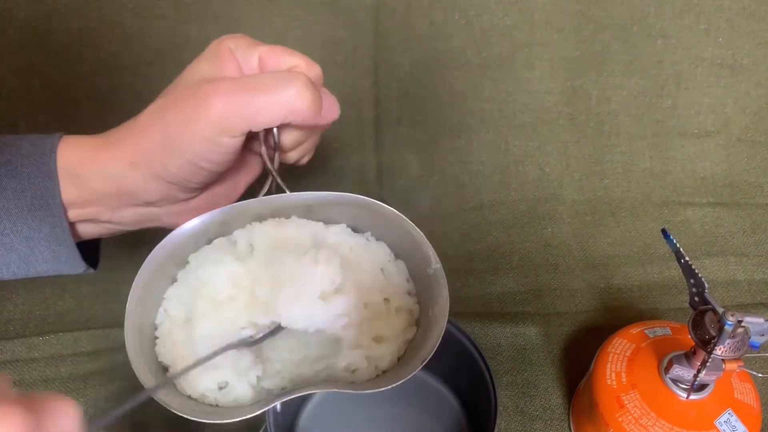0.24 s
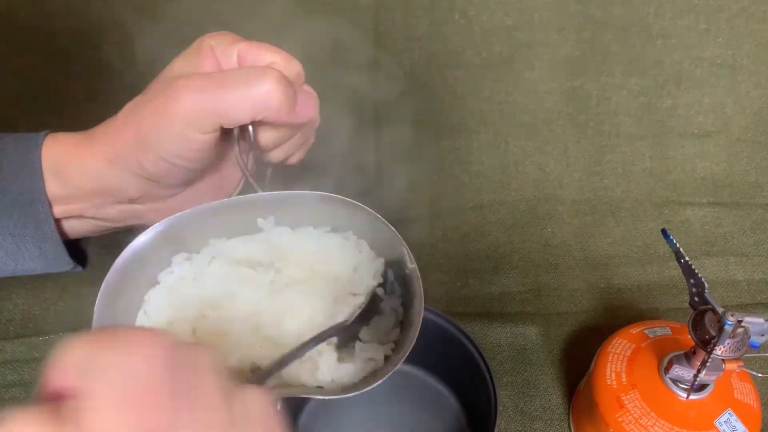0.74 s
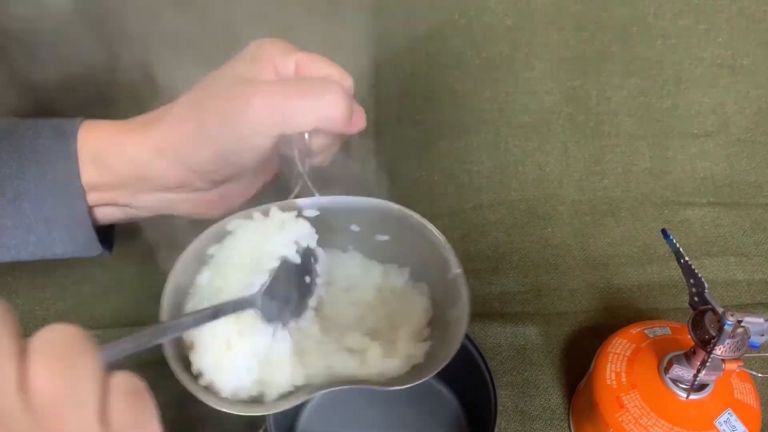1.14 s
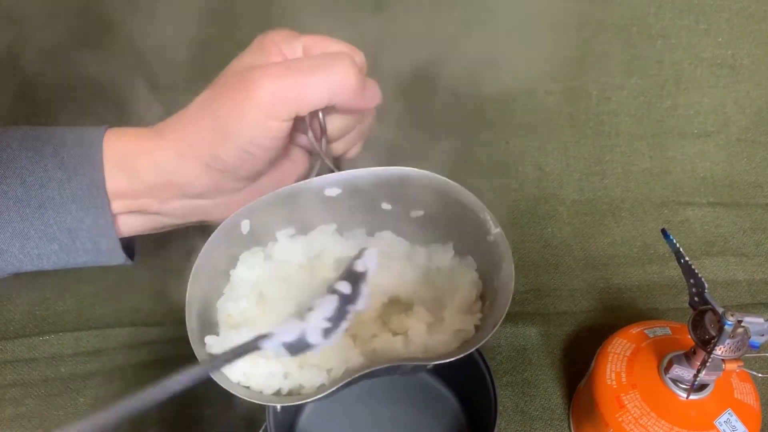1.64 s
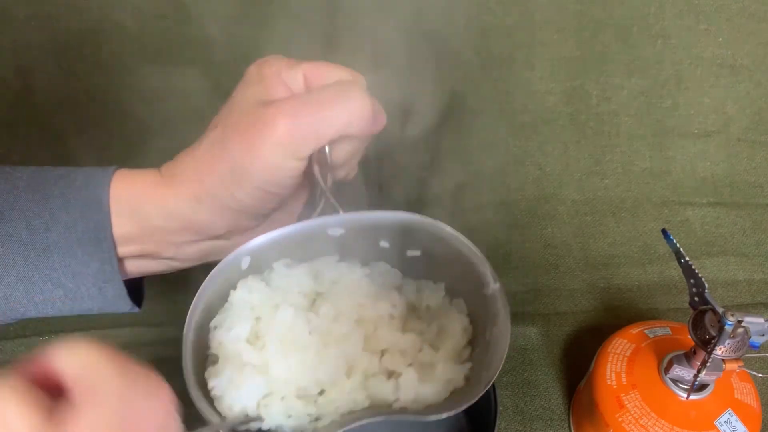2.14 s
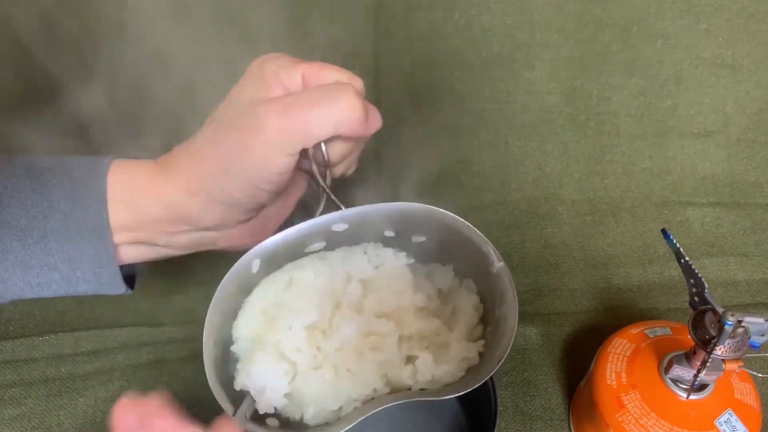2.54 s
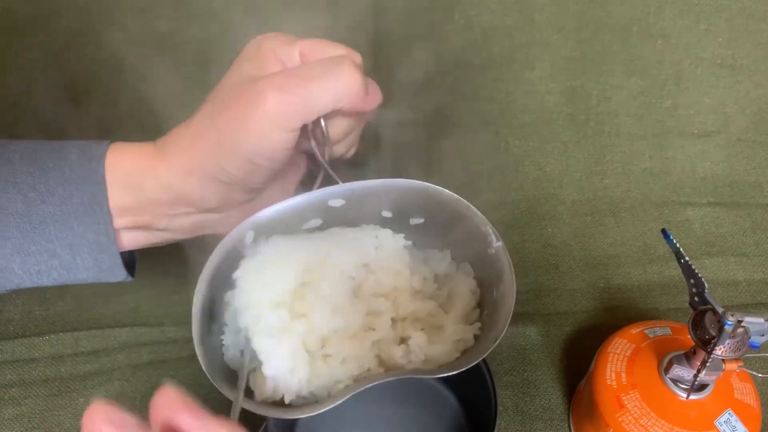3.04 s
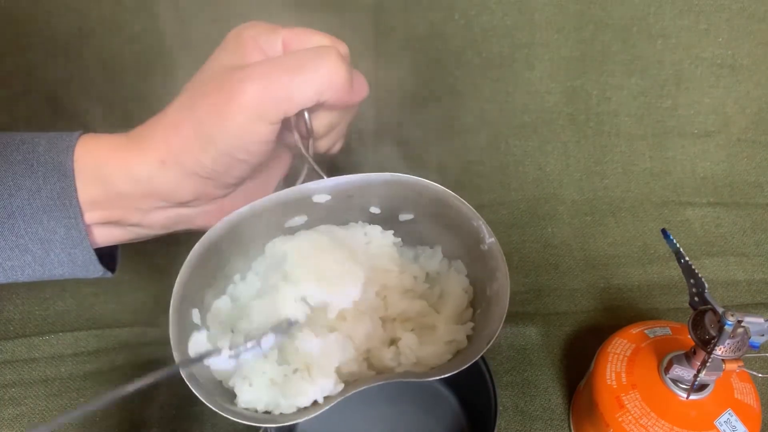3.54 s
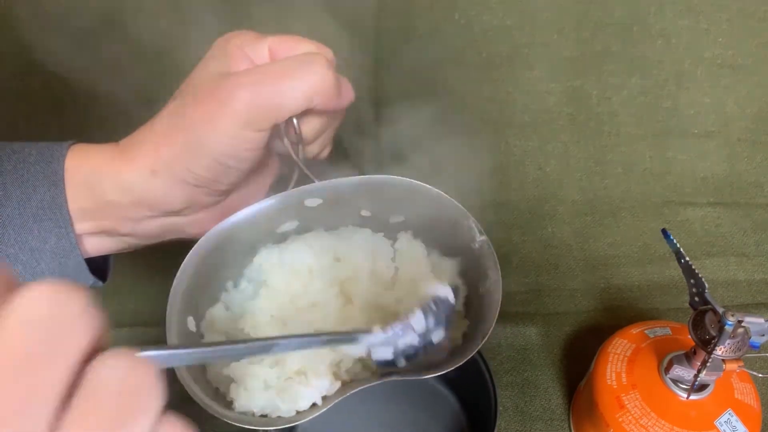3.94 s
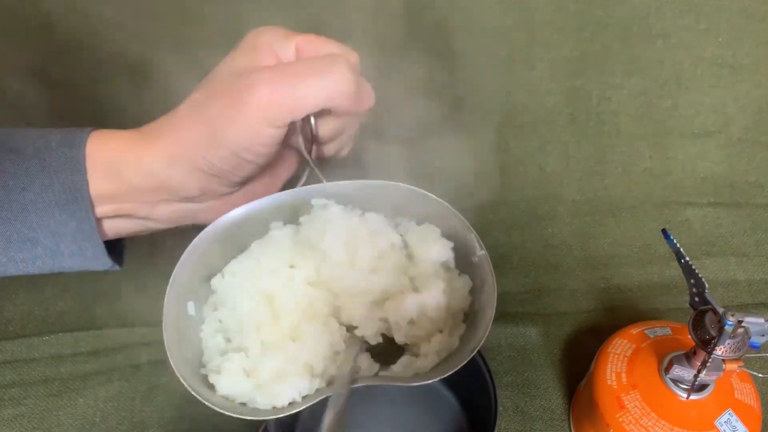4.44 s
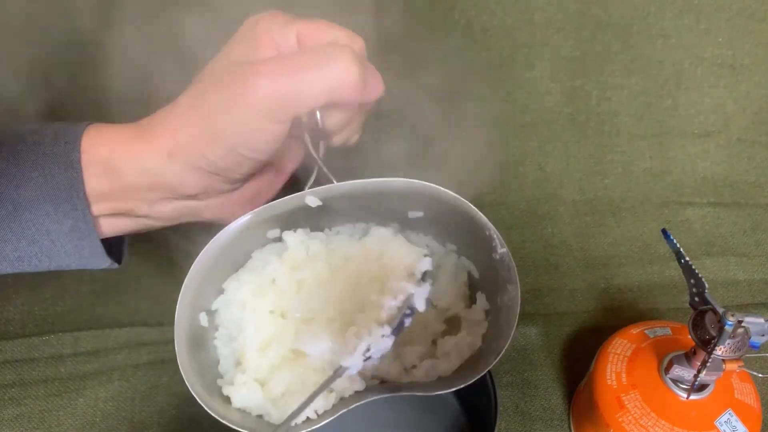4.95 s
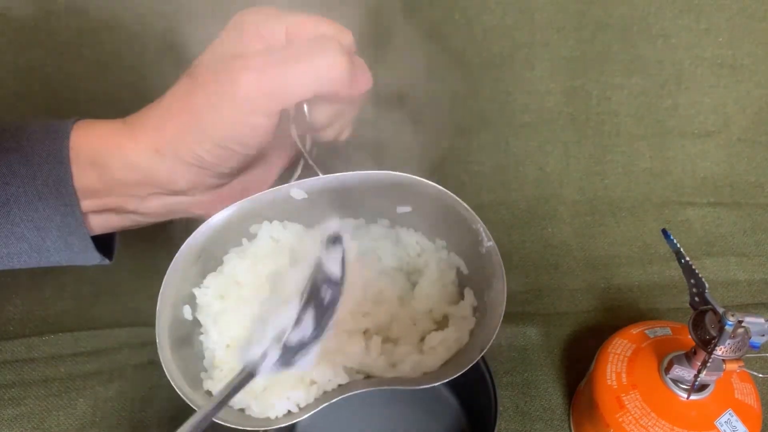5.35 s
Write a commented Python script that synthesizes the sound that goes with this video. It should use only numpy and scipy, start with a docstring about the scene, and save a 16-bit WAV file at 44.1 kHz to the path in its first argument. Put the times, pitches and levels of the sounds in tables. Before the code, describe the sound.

Close clinks, hollow thuds and a short scrape of a spoon stirring rice in a metal cup, with small paired clicks.

```python
"""Spoon in a camping cup of rice

Close to one microphone, a steel spoon works cooked rice in a metal cup hung from its wire handle.
It knocks and clinks, thuds through the rice, scrapes twice and clacks on the cup's wall, ringing
the metal's modes. Sticky grains rustle, and small springy clicks come in pairs, like a mouse button.
Hard surfaces nearby give a short reverberation, over still air and a faint hum."""
import sys
import numpy as np
from scipy import signal
from scipy.fft import rfft, irfft, next_fast_len
from scipy.io import wavfile

SR = 44100
rng = np.random.default_rng(int(sys.argv[2]) if len(sys.argv) > 2 else 0)


def bounce(signal):
    """Save signal as a 16-bit WAV file at the path given by the first command-line argument."""
    frames = np.transpose(np.atleast_2d(signal))
    limited = np.clip(frames, -1, 1)
    pcm = np.round(limited * 32767).astype(np.int16)
    wavfile.write(sys.argv[1], SR, pcm)


N = 246953


def from_db(db):
    """Decibels to gain."""
    return 10 ** (np.asarray(db) / 20)


def rms_one(x):
    """Scale to rms 1."""
    return x / np.sqrt(np.mean(x ** 2) + 1e-20)


def energy_one(x):
    """Scale to energy 1."""
    return x / np.sqrt(np.sum(x ** 2) + 1e-20)


def at_hz(points, hz):
    """Read a table on a log-frequency axis."""
    frequencies, values = np.transpose(points)
    return np.interp(np.log(np.maximum(hz, 1)), np.log(frequencies), values)


def through(x, response):
    """Pass a sound through an impulse response."""
    size = next_fast_len(N + len(response), True)
    return irfft(rfft(x, size) * rfft(response, size), size)[:N]


def colour(spectrum, size=8192):
    """Causal (minimum-phase) response of energy 1 with the given spectral shape."""
    hz = np.arange(size // 2 + 1) * SR / size
    cepstrum = irfft(np.log(from_db(at_hz(spectrum, hz))))
    cepstrum[1:size // 2] *= 2
    cepstrum[size // 2 + 1:] = 0
    return energy_one(irfft(np.exp(rfft(cepstrum)))[:size // 2])


def body(modes):
    """Response of energy 1 of damped modes that start together; wider ones die sooner."""
    t = np.arange(SR // 2) / SR
    ring = sum(from_db(db) * width * np.exp(-np.pi * width * t) * np.sin(2 * np.pi * hz * t)
               for hz, width, db in modes)
    return energy_one(ring)


def drift(per_s):
    """Slow wander between random values."""
    knots = rng.standard_normal(2048)
    return np.interp(np.arange(N) / SR * per_s, np.arange(len(knots)), knots)


def clicks(rows, column=1):
    """One impulse per row, with the level in the given column."""
    out = np.zeros(N)
    for row in rows:
        out[round(row[0] * SR)] += from_db(row[column])
    return out


def grains(per_s, spread_db):
    """Random slips of uneven size, rms 1."""
    slipping = rng.random(N) < per_s / SR
    signs = rng.choice([-1, 1], N)
    sizes = from_db(spread_db * np.minimum(rng.exponential(1, N), 4))
    return rms_one(slipping * signs * sizes)


def swell(start, length, db):
    """Gain of one smooth push."""
    progress = np.clip((np.arange(N) / SR - start) / length, 0, 1)
    return from_db(db) * np.sqrt(np.abs(np.sin(np.pi * progress)))


def stroke(start, length, db, attack_s, sag_db_per_s, release_db_per_s):
    """Gain of one push: a quick rise, a steady sag while it lasts, then a faster release."""
    t = np.arange(N) / SR - start
    fall_db = sag_db_per_s * np.clip(t, 0, length) + release_db_per_s * np.maximum(t - length, 0)
    return np.clip(t / attack_s, 0, 1) * from_db(db - fall_db)


# Decay among the hard surfaces around the microphone: (frequency [Hz], time to fall 60 dB [s])
ROOM_DECAY = [(100, 0.32), (300, 0.11), (700, 0.5), (1400, 0.2826), (4000, 0.42), (8000, 0.2555),
              (15000, 0.39)]
def reverb(x, build_s=0.0087, bands=14):
    """A diffuse tail builds up, then each band dies at its own rate."""
    t = np.arange(SR * 3 // 4) / SR
    white = rfft(rng.standard_normal(len(t)))
    hz = np.arange(len(white)) * SR / len(t)
    centres = np.geomspace(80, 16000, bands)
    tail = 0
    for centre, share in zip(centres, np.eye(bands)):
        band = irfft(white * at_hz(np.c_[centres, share], hz), len(t))
        tail = tail + band * np.exp(-np.log(1000) * t / at_hz(ROOM_DECAY, centre))
    build_up = 1 - np.exp(-(t / build_s) ** 2)
    return through(x, energy_one(tail * build_up))


def room(x, wet_db, build_s=0.015):
    """The direct sound at the microphone plus its reverberation."""
    return x + from_db(wet_db) * reverb(x, build_s)


# Still air all around: (frequency [Hz], relative level [dB])
AIR_SPECTRUM = [(12, -45), (20, -9), (49, -6.5), (86, -12.5), (123, 0.5), (146, -22.5), (177, -13),
                (234, -16.5), (328, -17), (357, -15.5), (574, -20), (3160, -32), (4670, -35.5), (7950, -37),
                (16000, -63.5)]
# Faint hum of the place: (frequency [Hz], rms level [dB], unsteadiness [0-1])
HUM_TONES = [(44.6, -66, 0.37), (59.2, -63, 0.59), (117.3, -62.5, 0.13), (125, -67.5, 0.14),
             (173, -70.5, 0.62), (325.2, -68.5, 0.09), (569, -73.5, 0.46), (685, -78.5, 0.081),
             (1316, -82, 0.13), (6900, -88.5, 0.13)]
def room_tone():
    """Still air, a trace of hiss and a wavering hum lie behind the cup."""
    t = np.arange(N) / SR
    air = from_db(-59.5) * rms_one(through(rng.standard_normal(N), colour(AIR_SPECTRUM)))
    hiss = from_db(-80) * rng.standard_normal(N)
    hum = 0
    for hz, db, unsteady in HUM_TONES:
        sway = 1 - unsteady + unsteady * (drift(14) + 1j * drift(6.8))  # in level and phase
        tone = np.exp(2j * np.pi * (hz * t + rng.random()))
        hum = hum + from_db(db) * rms_one(np.real(sway * tone))
    return air + hiss + hum


# Chatter of a small springy click: (frequency [Hz], relative level [dB])
CHATTER_SPECTRUM = [(300, -26), (600, 17.5), (1200, -14), (2500, -1), (5500, 3.5), (8500, 7), (11000, -8.5),
                    (14500, -8), (16000, -7)]
def springy_click(rows, modes, chatter_db, ring_db, seat_s=0.0095, seat_db=2.5, chatter_s=0.0021):
    """A snap, then a second contact as it seats; each chatters briefly and rings."""
    contacts = clicks(rows) + from_db(seat_db) * clicks([(s + seat_s, db) for s, db in rows])
    decay = np.exp(-1 / (chatter_s * SR))
    envelope = signal.lfilter([np.sqrt(1 - decay ** 2)], [1, -decay], contacts + 1e-18)
    chatter = through(rng.standard_normal(N) * envelope, colour(CHATTER_SPECTRUM))
    return from_db(chatter_db) * chatter + from_db(ring_db) * through(contacts, body(modes))


# Clicks off-microphone: (press time [s], release time [s], press level [dB], release level [dB])
CLICK_PAIRS = [(0.6403, 0.7273, -32.5, -33), (1.2735, 1.38, -35.5, -32.5), (2.059, 2.1880, -35, -33),
               (4.3643, 4.42, -34, -33), (4.8300, 4.899, -33.5, -33)]
# Ring of the press and of the release: (frequency [Hz], width [Hz], level [dB])
PRESS_MODES = [(8040, 60, 6.5), (8330, 75, -20), (6800, 500, -15), (5400, 160, -18)]
RELEASE_MODES = [(5350, 130, -1.5), (6550, 550, -12), (12500, 550, -12), (14600, 300, -10)]
def paired_clicks():
    """Small springy clicks in pairs, like a mouse button: a ringing press, a drier release."""
    presses = [(s, db) for s, _, db, _ in CLICK_PAIRS]
    releases = [(s, db) for _, s, _, db in CLICK_PAIRS]
    down = springy_click(presses, PRESS_MODES, chatter_db=-4.5, ring_db=-6.5)
    up = springy_click(releases, RELEASE_MODES, chatter_db=-7, ring_db=-12)
    return room(down + up, wet_db=7, build_s=0.0016)


# Rice pushed about inside the cup: (time [s], length [s], level [dB])
RICE_PUSHES = [(0.0, 0.019, -60), (0.894, 0.1, -67), (1.603, 0.071, -72.5), (1.876, 0.07, -61.5),
               (2.271, 0.23, -65), (3.032, 0.1, -67), (3.126, 0.28, -76)]
# Its rustle: (frequency [Hz], relative level [dB])
RICE_SPECTRUM = [(500, 3.5), (1500, -0.5), (4000, -2.5), (7500, 1), (11000, -8.5), (13000, -6.5),
                 (16000, -8)]
def rice():
    """Sticky grains part in soft swells."""
    push = sum(swell(*row) for row in RICE_PUSHES)
    rustle = through(push * grains(per_s=6900, spread_db=2), colour(RICE_SPECTRUM))
    return from_db(3.5) * room(rustle, wet_db=-1.5)


# Brief metal tones, almost dry: (time [s], length [s], level [dB], frequency [Hz])
METAL_TONES = [(0.387, 0.21, -73.5, 7900), (0.396, 0.19, -79, 9700), (1.179, 0.012, -48, 4190),
               (1.575, 0.01, -56.5, 715), (3.823, 0.1, -53, 3260), (3.862, 0.04, -53, 4960),
               (3.91, 0.015, -59, 13000)]
def metal_tones(mode_q=42):
    """One mode sounds in each: thin squeaks, and short rings after a knock or clink."""
    drive = grains(per_s=2200, spread_db=3)
    ringing = sum(through(drive * swell(start, length, db), body([(hz, hz / mode_q, 0)]))
                  for start, length, db, hz in METAL_TONES)
    return room(ringing, wet_db=-19)


# The whole cup jolted on its handle: (time [s], level [dB])
CUP_JOLTS = [(1.0420, -7.5), (1.0490, -4), (2.3110, -10.5), (2.3225, -4.5)]
# Low modes of the hanging cup: (frequency [Hz], width [Hz], level [dB])
HANGING_MODES = [(115, 17, -17), (192, 62, -2.5), (211, 25, -4), (280, 8.4, -9.5), (335, 28, -0.5),
                 (370, 24, -21)]
def jolts():
    """The whole cup sways under two blows, and the handling rumbles around the first."""
    band = signal.butter(2, [28, 105], "band", fs=SR, output="sos")
    rumble = rms_one(signal.sosfilt(band, rng.standard_normal(N)))
    handling = stroke(1.026, length=0.19, db=-48, attack_s=0.009, sag_db_per_s=29, release_db_per_s=246)
    sway = through(clicks(CUP_JOLTS), body(HANGING_MODES))
    return room(sway, wet_db=-2.5, build_s=0.0041) + rumble * handling


# Spoon dragged along the cup's wall: (time [s], length [s], level [dB], attack [s])
SCRAPE_STROKES = [(3.6357, 0.11, -25, 0.0043), (3.826, 0.092, -49, 0.033), (3.899, 0.056, -35.5, 0.0076)]
# Its friction noise: (frequency [Hz], relative level [dB])
SCRAPE_SPECTRUM = [(100, -34), (200, -13.5), (320, -6), (520, -8), (820, -11), (1000, -7.5), (1350, -4),
                   (2400, -5.5), (3400, -3.5), (5000, -7.5), (7000, -10.5), (9800, -18), (11000, -27.5),
                   (14000, -31), (16000, -50)]
# The wall before the spoon damps it, and the cup's long ring: (frequency [Hz], width [Hz], level [dB])
SCRAPED_WALL_MODES = [(2340, 14, 2), (2590, 94, 0), (3010, 17, 3), (4300, 29, -18), (4380, 56, -9),
                      (4900, 76, -10), (5270, 86, -4), (5600, 34, -20), (6500, 42, -7), (6680, 70, -6),
                      (7160, 74, -10), (7870, 40, -4), (8200, 21, -3), (9000, 38, -13), (8650, 69, -3),
                      (12100, 69, -20)]
CUP_RING_MODES = [(1197, 1.9, -2), (1212, 5, 6), (1276, 6.4, 12), (1350, 3.9, -3), (1380, 4.7, 4),
                  (1500, 7, -15), (1852, 6.6, -6), (2040, 7.6, -5), (2314, 12, 2), (4124, 8.8, 1),
                  (5060, 5.9, -7), (5400, 8, -6)]
def scrapes(damping_hz=30):
    """Dense slips of the spoon along the wall excite its modes and set the cup ringing."""
    # pressure eases through a stroke, then the spoon lifts
    pressure = sum(stroke(*row, sag_db_per_s=110, release_db_per_s=268) for row in SCRAPE_STROKES)
    slips = grains(per_s=5000, spread_db=3) * pressure
    pressed_wall = [(hz, width + damping_hz, db) for hz, width, db in SCRAPED_WALL_MODES]
    metal = from_db(-10.5) * body(pressed_wall) + from_db(-18) * body(CUP_RING_MODES)
    friction = through(slips, colour(SCRAPE_SPECTRUM))
    return from_db(-1) * room(friction + through(slips, metal), wet_db=-8)


def strike(rows, modes, radiated, crack_db, crack_s, bend_s, low_hz, wet_db):
    """Contacts ring a body and its countless weak modes crack; gives the direct sound and room tail."""
    size = SR // 2
    t = np.arange(size) / SR
    contacts, tone = clicks(rows), colour(radiated)
    burst = rng.standard_normal(size) * np.exp(-t / crack_s)
    crack = energy_one(signal.fftconvolve(burst, tone)[:size])
    low_cut = signal.butter(2, low_hz, "high", fs=SR, output="sos")
    response = signal.sosfilt(low_cut, body(modes) + from_db(crack_db) * crack)
    # bending waves in thin metal carry the treble first; bend_s is the delay at 1 kHz
    hz = np.arange(size + 1) * SR / (2 * size)
    phase_lag = 4 * np.pi * bend_s * np.sqrt(1000 * hz)
    response = irfft(rfft(response, 2 * size) * np.exp(-1j * phase_lag))[:size]
    return through(contacts, response), from_db(wet_db) * reverb(through(contacts, tone))


# Light touches of the spoon: (time [s], level [dB])
SPOON_CLINKS = [(1.4705, -20), (1.4735, -23.5), (1.4810, -18), (1.5715, -26.5), (1.5755, -22.5)]
# The spoon's own ring: (frequency [Hz], width [Hz], level [dB])
SPOON_MODES = [(3460, 110, -21), (5540, 78, -2), (5500, 51, -17), (6260, 72, -7), (7600, 43, -15),
               (7920, 33, 14), (8800, 34, -8), (10320, 43, 5), (10800, 36, -15), (12800, 90, -12),
               (15200, 150, -22)]
# What it radiates all round: (frequency [Hz], relative level [dB])
SPOON_SPECTRUM = [(500, 5.5), (1500, -7.5), (3500, -17), (5600, -1), (6800, -2.5), (8000, 6), (10000, 3),
                  (12000, -8), (15500, -10)]
def clinks():
    """Lightly struck, the spoon rings high and thin."""
    direct, tail = strike(SPOON_CLINKS, SPOON_MODES, SPOON_SPECTRUM,
                          crack_db=-3, crack_s=0.006, bend_s=0.00029, low_hz=1500, wet_db=-3.5)
    return direct + tail


# Spoon on the rim: (time [s], level [dB])
RIM_KNOCKS = [(1.0412, -15.5), (1.0440, -21), (1.0458, -4), (1.0468, -18), (1.1828, -24.5), (1.1845, -34),
              (1.827, -45), (3.910, -35)]
# The rim's ring at the microphone: (frequency [Hz], width [Hz], level [dB])
RIM_MODES = [(705, 31, 14), (940, 120, -31), (1930, 156, -7), (3270, 45, -27), (3350, 29, 18),
             (4470, 47, -1), (4820, 120, 10.5), (5300, 260, 8.5), (6330, 170, 7), (7700, 350, -11),
             (9800, 640, -16), (10700, 440, 5), (13300, 400, 1), (13300, 530, 5), (15900, 440, 1)]
# What it radiates all round: (frequency [Hz], relative level [dB])
RIM_SPECTRUM = [(200, -22), (600, -6), (1050, 2), (1450, -6.5), (2200, -6), (3300, 2), (4500, -0.5),
                (6000, -3), (9000, 0), (12000, -8), (14500, -6), (16000, -12)]
def knocks():
    """The spoon knocks the rim and rings its bright modes."""
    direct, tail = strike(RIM_KNOCKS, RIM_MODES, RIM_SPECTRUM,
                          crack_db=-0.5, crack_s=0.006, bend_s=0.00029, low_hz=400, wet_db=-6)
    return direct + tail


# Spoon bumping the bottom through the rice: (time [s], thud level [dB], tick level [dB])
BOTTOM_THUDS = [(0.672, -33, -70), (2.3072, 4.5, -21.5), (2.3218, 6.5, -22.5)]
# The filled bottom, and bare metal touching: (frequency [Hz], width [Hz], level [dB])
BOTTOM_MODES = [(299, 12, 10.5), (418, 21, -1), (500, 35, -6), (506, 30, 9), (607, 46, 15), (653, 24, 16.5),
                (770, 12, -5), (860, 40, -20), (1280, 13, -2)]
BARE_METAL_MODES = [(1244, 27, 13), (1760, 160, 6.5), (2620, 500, 0.5), (3670, 110, 1), (5450, 130, 0.5),
                    (7000, 550, -7), (8600, 660, -6.5), (13000, 900, -11)]
def thuds():
    """Rice softens the contact and damps the bottom to a short hollow note; bare metal adds a tick."""
    cushion = signal.butter(1, [170, 1000], "band", fs=SR, output="sos")
    hits = signal.sosfilt(cushion, clicks(BOTTOM_THUDS))
    tick = room(through(clicks(BOTTOM_THUDS, column=2), body(BARE_METAL_MODES)), wet_db=-9)
    hollow = room(through(hits, body(BOTTOM_MODES)), wet_db=-11, build_s=0.007)
    ring = from_db(-25) * through(hits, body(CUP_RING_MODES))
    return hollow + ring + tick


# Spoon chattering hard against the cup's wall: (time [s], level [dB])
WALL_CLACKS = [(5.3484, 7), (5.3512, -13)]
# The wall's ring at the microphone: (frequency [Hz], width [Hz], level [dB])
WALL_MODES = [(540, 420, -15), (1430, 17, -15), (1850, 56, -2), (2720, 130, 3.5), (3840, 640, -0.5),
              (4700, 250, -21), (6450, 300, -7), (9300, 210, -14), (9580, 91, 2), (10100, 310, 0),
              (11940, 170, -1), (14400, 550, -5.5)]
# What it radiates all round: (frequency [Hz], relative level [dB])
WALL_SPECTRUM = [(130, -13), (300, -4), (550, -4), (900, -9), (1280, 11.5), (1550, 6.5), (1900, 7),
                 (2800, -8), (4000, -4), (5300, -4.5), (6500, -7), (9800, -4.5), (11500, -14), (13500, -12),
                 (16000, -21)]
# Echoes off hard surfaces a few metres away: (delay [s], level [dB])
NEAR_ECHOES = [(0.0128, -21), (0.0205, -19)]
def clacks():
    """The hardest blow: a crack, the wall's modes, the cup's long ring and two early echoes."""
    direct, tail = strike(WALL_CLACKS, WALL_MODES, WALL_SPECTRUM,
                          crack_db=-1.5, crack_s=0.0029, bend_s=0.002017, low_hz=420, wet_db=-2)
    echoes = through(direct, clicks(NEAR_ECHOES)[:SR // 10])
    ring = from_db(-8) * through(clicks(WALL_CLACKS), body(CUP_RING_MODES))
    return direct + echoes + tail + ring


def scene():
    """Spoon, cup, clicks and room tone meet at one microphone."""
    contacts = knocks() + jolts() + thuds() + clacks() + clinks() + paired_clicks()
    return (contacts + scrapes() + metal_tones() + rice() + room_tone())[None]


def record(dry):
    """The microphone's signal is cut steeply above 16.1 kHz."""
    return signal.sosfilt(signal.ellip(10, 0.1, 80, 16100, fs=SR, output="sos"), dry)


dry = scene()
out = record(dry)
bounce(out)
```